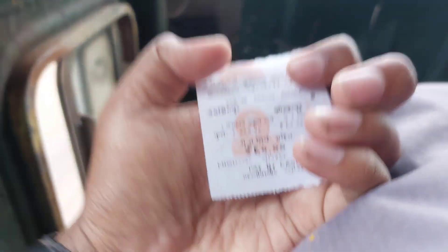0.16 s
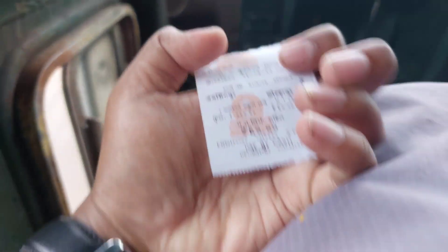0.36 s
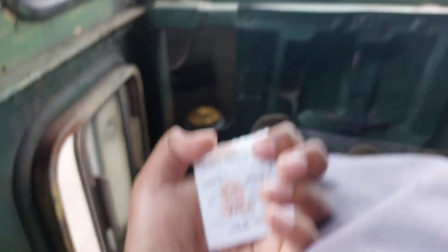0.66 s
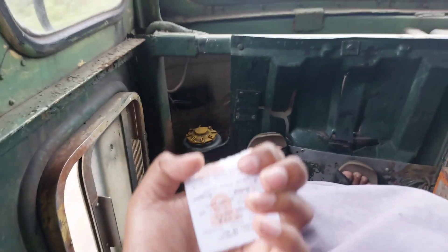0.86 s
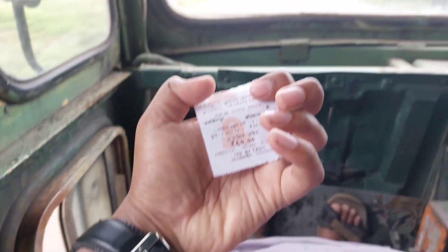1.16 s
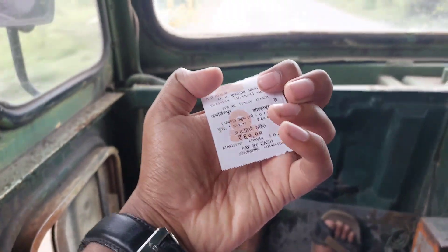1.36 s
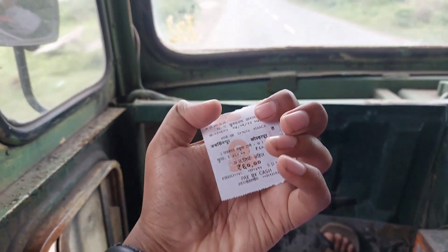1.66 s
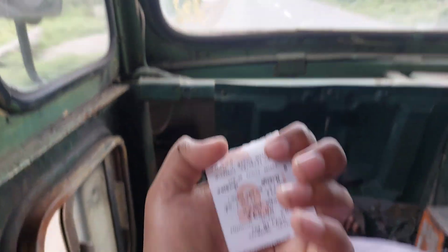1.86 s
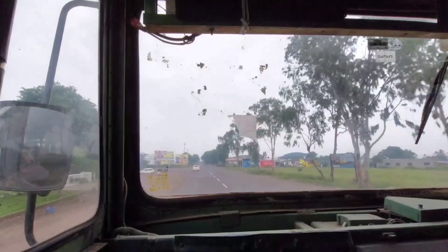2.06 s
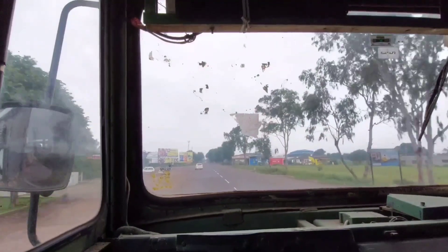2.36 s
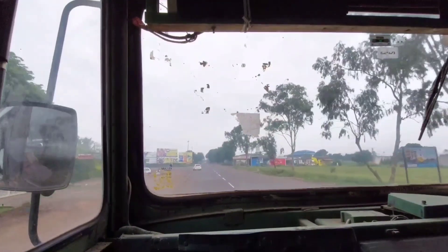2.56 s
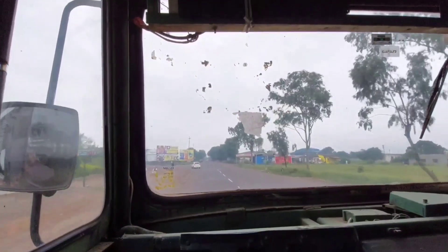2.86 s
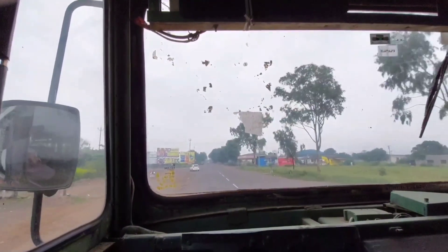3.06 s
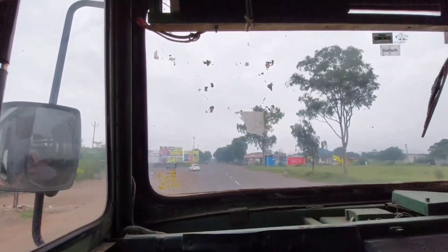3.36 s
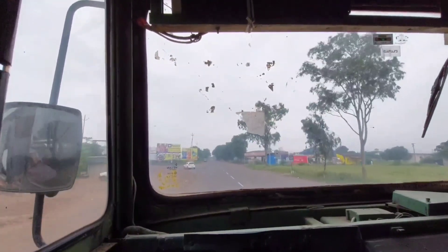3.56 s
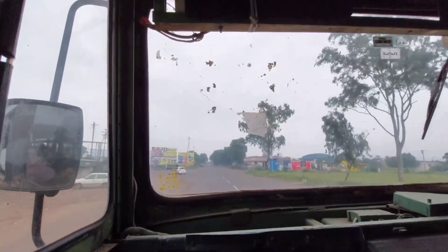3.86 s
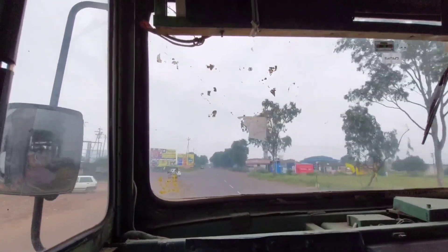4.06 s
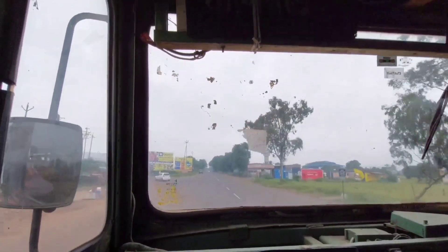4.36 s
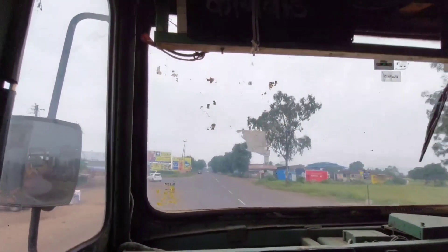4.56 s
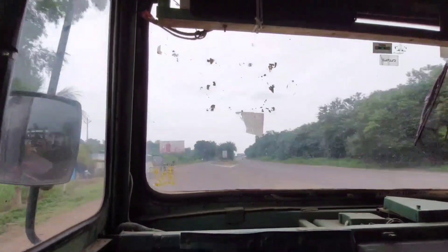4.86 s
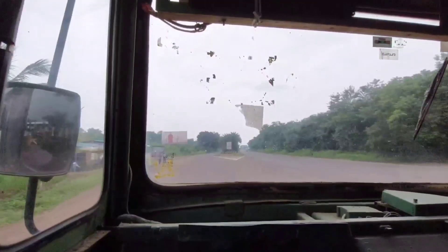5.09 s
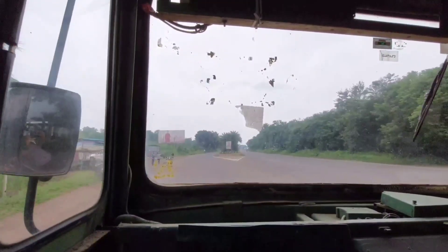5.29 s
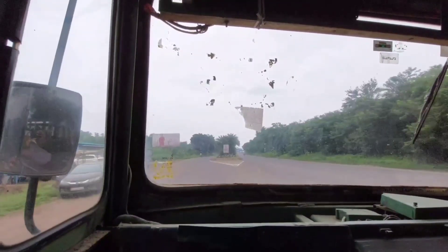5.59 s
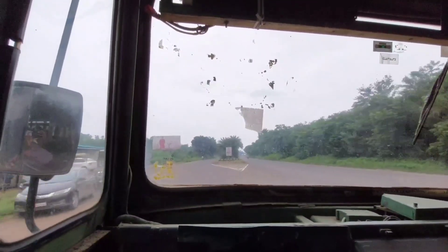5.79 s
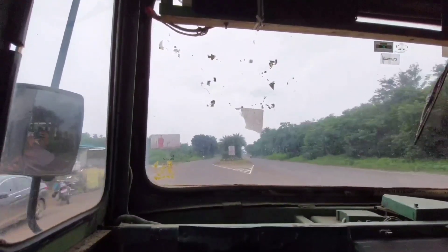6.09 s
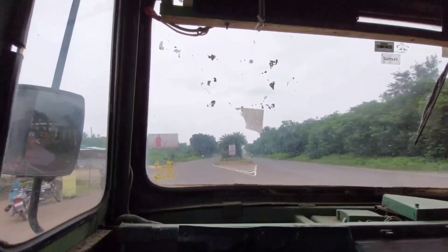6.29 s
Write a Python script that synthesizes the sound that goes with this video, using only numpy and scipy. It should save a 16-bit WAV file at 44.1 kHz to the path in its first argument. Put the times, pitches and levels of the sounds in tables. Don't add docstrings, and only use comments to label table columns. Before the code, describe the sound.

From 0 to 1.8 s, a loud old bus cabin: a rough diesel drone, steady then easing, buried in a broad roaring rush of tyres and air, with a faint high turbo whistle, dense gritty ticks, a whine from about 0.55 s and panel knocks near 0.4, 0.9, 1.05 and 1.3 s, a chirp at 1.3 s and a longer rattle at 1.72 s. It cuts dead to silence for about 0.14 s. At 1.95 s a stuttering click opens a far quieter ride: soft smooth hum, thin rush, slight rumble swells, engine sagging slowly, with a brief upward flare around 4.6 s. At 4.78 s another small click switches to a lower, slower hum with an early gust, faint glass ticks, weak squeaks and a low knock with chirps at 5.97 s, ending abruptly at 6.44 s. Wide stereo, dry and close.

```python
import sys
import numpy as np
from scipy import signal
from scipy.io import wavfile
from scipy.ndimage import uniform_filter1d

SR = 44100
rng = np.random.default_rng(int(sys.argv[2]) if len(sys.argv) > 2 else 0)


def gain_from_decibels(decibels):
    exponent = np.asarray(decibels, float) / 20
    return 10 ** exponent


def generate_wav(sig):
    pcm = np.round(np.clip(np.atleast_2d(sig).T, -1, 1) * 32767).astype(np.int16)
    wavfile.write(sys.argv[1], SR, pcm)


N = 283563

# [start t/s, end t/s, gain at the start, fade-in t/s]
MOMENTS = [
    (0, 1.8085, 1, 0),
    (1.9499, 4.7823, 1, 0),
    (4.7823, 6.44, .15, .02),
]
# [t/s, gain held until the next row]
STUTTER = [
    (0, 1),
    (1.9499, .6),
    (1.9512, .12),
    (1.9548, .7),
    (1.9585, .2),
    (1.9621, 1),
]
# [t/s, height, fading t/s (negative = grows up to the step)]
JOINS = [
    (1.9499, .009, .0008),
    (1.9512, -.007, -.0005),
    (1.9548, -.014, .001),
    (1.9573, .007, .001),
    (1.9621, -.032, .001),
    (4.7823, .026, -.001),
    (4.7872, .005, -.0005),
    (4.8022, .016, -.001),
]

# [t/s, twice the firing rate f/Hz, effort level/dB]
DRIVE = [
    [(0.0, 146.7, -0.5), (0.75, 147.3, 1), (1.05, 147.2, -1.5), (1.66, 146.7, -1.5), (1.81, 146.1, -5)],
    [(1.96, 139.5, 0), (2.35, 140.6, -1.5), (2.8, 139, 2), (3.25, 138.6, 2.5), (4.46, 133.8, 2),
     (4.65, 142.1, -2), (4.78, 137, -13.5)],
    [(4.8, 120.5, -5.5), (4.97, 121.9, 0), (5.13, 124.4, 0.5), (5.5, 123.9, -1.5), (5.8, 121.5, 1),
     (6.43, 118.8, -.5)],
]
# [multiple of the firing rate, rms level/dB, level gained over the moment/dB]
ORDERS = [
    [(1, -29, -1), (1.5, -40, 0), (2, -27, -1), (2.5, -31, 7), (3, -27, -5), (10 / 3, -32, 2),
     (3.5, -34, -6), (4, -35, 0), (4.5, -36, -7), (5, -35, -6), (5.5, -38, -6), (9, -44, 6), (12, -47, 3),
     (17, -50, 4)],
    [(1, -56, 2), (1.5, -57, 1), (2, -43, 2), (2.5, -53, 0), (3, -56, 2), (3.5, -57, 0), (4, -49, 2),
     (5, -62, 1), (6, -65, 2), (7, -66, -2), (8, -68, 1), (12, -69, 2)],
    [(1, -58, 1), (1.5, -61, 0), (2, -45.5, 1), (2.5, -58, 1), (3, -49.5, -1), (3.5, -56, 1), (4, -60, 0),
     (5.5, -64, -2), (8, -67, 0)],
]
UNEVEN_DB = [-40, -62, -63]

# [f/Hz, density level/dB per Hz]
ROAD_COLOURS = [
    [(45, 0.5), (100, -8), (240, -7), (420, -11), (700, -16.5), (1000, -16.5), (1600, -19.5), (2500, -26),
     (3500, -30.5), (5100, -27.5), (7500, -38.5), (10000, -47), (12200, -41), (15600, -53.5)],
    [(45, -5.5), (100, -15), (260, -9.5), (370, -22.5), (520, -21), (1000, -24.5), (1700, -26), (3300, -34),
     (5200, -36), (7200, -40.5), (9500, -53.5), (11000, -48.5), (12800, -45), (15600, -50.5)],
    [(45, -1), (80, -7), (200, -9), (340, -14), (400, -19.5), (520, -20), (1000, -24), (2200, -28.5),
     (3400, -35.5), (4800, -32), (7000, -41.5), (9700, -57), (12200, -53.5), (15600, -59)],
]
ROAD_DB = [-18, -40, -39.5]
# [f/Hz, width f/Hz, level/dB]
RINGING_PANELS = [
    [(260, 29, 4.5), (550, 21, 0.5), (833, 94, 2), (1060, 85, 2.5), (1245, 70, 3), (2120, 90, 0.5),
     (2620, 180, 1.5)],
    [(468, 66, 5.5), (770, 72, 4), (1090, 51, 6), (1260, 37, 5), (1550, 56, 3.5), (2500, 140, 3.5)],
    [(490, 68, 5), (740, 70, 3.5), (1110, 56, 8), (1447, 78, 7.5), (2520, 100, 1), (4370, 180, 1.5)],
]
LAYER_HZ = [90, 700, 5000, 11500]
# [t/s, gust level/dB]
GUSTS = [
    [(0.0, -4.5), (0.25, 3), (0.7, 5.5), (1.05, -0.5), (1.66, -2.5), (1.81, 6.5)],
    [(1.96, 0), (2.3, 0.9), (2.8, -0.1), (4.43, 0), (4.62, 3), (4.78, 5.5)],
    [(4.8, 2.5), (4.97, 4), (5.45, -0.5), (5.9, 0.5), (6.2, 2), (6.43, 1.5)],
]
GUST_SHARES = [
    (.05, 0.1, 0.23, 1),
    (.05, 0.53, 0.66, 0.8),
    (.05, .8, .5, .95),
]
# [t/s, level/dB, length t/s]
BUMPS = [(0.14, 0, 0.11), (0.595, -3, 0.14), (0.89, 2, 0.083), (1.5, 0, 0.13), (1.814, -1, 0.082),
         (2.14, 6.5, 0.53), (3.1, 5, 0.26), (3.72, 3, 0.067), (4.677, 7.5, 0.12), (5.35, 3, 0.48),
         (6.101, 5.5, 0.079)]

# [f/Hz, likeness 0-1, phase lead of the left/rad]
MIC_PAIR = [(60, 1, 0.046), (250, 0.77, 0.28), (600, 0.48, 0.28), (970, 0.24, 1.3), (1400, 0.17, 3.6),
            (1950, 0.4, 4.55), (3020, 0, 5.7), (6000, 0.07, 4.5)]
# [f/Hz, left minus right level/dB]
MIC_LEAN = [
    [(60, -2), (700, -1.5), (2400, 1), (4800, -6.5), (6500, -3), (8400, 6), (11500, 1), (15500, 13)],
    [(60, -1), (700, -1), (2800, 1), (6500, 0), (8700, 5), (12500, -3), (14000, -2), (15500, 1)],
    [(60, -1.5), (700, -1.5), (2400, 2), (4800, -7), (6500, -2), (8600, 7), (11500, 4), (15500, 10)],
]

# [t/s, f/Hz, rms level/dB]
TURBO = [
    [(0, 8650, -54), (.2, 8500, -54), (.8, 9570, -54), (.98, 9560, -56), (1.3, 8750, -57.5),
     (1.81, 7850, -55.5)],
    [(1.95, 7720, -71), (2.5, 7250, -72), (3, 6950, -71), (3.7, 6660, -72), (4.3, 6470, -73),
     (4.55, 6450, -77), (4.79, 6900, -84)],
    [(4.78, 7900, -79), (5.5, 6950, -77), (6.1, 6420, -76), (6.43, 6250, -76)],
]
TURBO_WIDTH_HZ = [130, 40, 50]

# [rate per s, level/dB]
TICKS = [
    (60, -54),
    (40, -77),
    (40, -78),
]
# [t/s, peak level/dB, t60 t/s]
GLASS = [(.1, -36, .027), (1.49, -47, .1), (2.375, -63, .1), (4.76, -57, .06), (5.632, -59, .03),
         (5.642, -67, .1), (5.718, -67, .03), (5.758, -67, .03), (5.945, -66, .04), (6.165, -63, .05),
         (6.205, -66, .1)]
# [t/s, peak level/dB, centre f/Hz, width f/Hz, t60 t/s]
RATTLES = [
    (.4, -30.5, 4450, 5000, .15),
    (0.8892, -27.5, 4930, 6000, 0.071),
    (1.052, -33, 6492, 9070, 0.094),
    (1.0779, -28.5, 5000, 9000, 0.072),
    (1.2966, -33, 7980, 8997, 0.059),
    (1.72, -33.5, 4970, 2480, 0.67),
    (4.56, -61, 2400, 3500, 1.5),
    (5.9722, -59, 5010, 8000, 0.11),
    (5.973, -47, 1500, 900, 0.1),
    (6.2734, -62, 5035, 3994, 0.049),
]
# [start t/s, length t/s, f/Hz, glide f/Hz, rms
# level/dB]
WHINES = [
    (.55, .6, 1772, -2, -46),
    (3.94, .15, 1540, 85, -64),
    (4.14, .26, 1545, 80, -65),
    (5.971, .05, 4360, -60, -61),
]
# [start t/s, length t/s, f/Hz, rms level/dB]
SQUEAKS = [
    (1.293, .021, 3340, -40),
    (3.1, .4, 1085, -67),
    (4.9, .6, 1108, -69),
    (5.22, .12, 1452, -66),
    (5.972, .024, 1445, -56),
    (5.975, .035, 5600, -67),
    (5.98, .04, 4600, -66),
    (6.15, .2, 1452, -68),
]

LOW_CUT_HZ = 57
STEADY_SHAKE_HZ, SHAKE_PER_GLIDE = 2, .075
SQUEAK_SAG, SQUEAK_SHAKE = .01, .017
GLASS_HZ, GLASS_WIDTH_HZ = 12050, 3900
RATTLE_LEAN = 0.46
CLOSE_S = .0004


def read(points, hz, column=1):
    table = np.array(points)
    return np.interp(np.log(hz + 1), np.log(table[:, 0] + 1), table[:, column])


def evened(x):
    return x / np.sqrt(np.mean(x ** 2) + 1e-20)


def wander(t, top_hz, count):
    coarse = np.arange(t[0], t[-1] + .01, .005)
    hz = np.geomspace(top_hz / 12, top_hz, 12)[:, None, None]
    sines = np.sin(2 * np.pi * (hz * coarse + rng.random((12, count, 1))))
    drift = (sines / np.sqrt(hz)).sum(0)
    return np.array([np.interp(t, coarse, evened(row)) for row in drift])


def resonate(x, hz, width):
    turn = np.exp(2j * np.pi * np.cumsum(hz * np.ones(x.shape[-1])) / SR)
    r = np.exp(-np.pi * width / SR)
    return 2 * (turn * signal.lfilter([1 - r], [1, -r], x / turn)).real


def resonant_noise(length, hz, width):
    once = resonate(rng.standard_normal((2, length)), hz, width)
    return evened(resonate(once, hz, width))


def add(mix, s, sound):
    part = mix[:, round(s * SR):][:, :sound.shape[1]]
    part += sound[:, :part.shape[1]]


def engine(t, rows, tones, uneven_db, sides, waver_db=1.0, uneven_waver_db=3.5, slip_rad=.13):
    s, twice_hz, effort_db = np.transpose(rows)[:3]
    firing = uniform_filter1d(np.interp(t, s, twice_hz), size=5000, mode="nearest") / 2
    turns = np.cumsum(firing) / SR
    effort_db = uniform_filter1d(np.interp(t, s, effort_db), size=4410, mode="nearest")

    sixths = np.array([k for k in range(4, 33) if k % 3]) / 6
    sixth_db = uneven_db + 2.6 * rng.standard_normal(len(sixths))
    sixth_db -= 3.5 * np.maximum(sixths - 3.6, 0)
    order, db, gained_db = np.concatenate([np.transpose(tones), [sixths, sixth_db, 0 * sixths]], axis=1)
    count = len(order)

    trend_db = gained_db[:, None] * np.linspace(-.5, .5, len(t))
    restless_db = np.where(np.arange(count) < len(tones), waver_db, uneven_waver_db)[:, None]
    level = gain_from_decibels(db[:, None] + trend_db + restless_db * wander(t, 6.0, count))
    phase = 2 * np.pi * (order[:, None] * turns + rng.random((count, 1)))
    phase += slip_rad * wander(t, 6.0, count)

    order_hz = order * firing.mean()
    lead = read(MIC_PAIR, order_hz, column=2)
    right_db = 0.4 * rng.standard_normal(count) - read(sides, order_hz) / 2
    mics = np.array([gain_from_decibels(-right_db) * np.exp(1j * lead), gain_from_decibels(right_db) + 0j])
    both = mics.real @ (level * np.cos(phase)) - mics.imag @ (level * np.sin(phase))
    return np.sqrt(2) * gain_from_decibels(effort_db - effort_db.mean()) * both


def road(t, gusts, shares, colour, panels, level_db, sides, patchy_db=0.87, flicker_db=1.15):
    frames, hz = len(t) // 256 + 5, np.fft.rfftfreq(1024, 1 / SR)
    a, b, c, d, patches = rng.standard_normal((frames, 513, 5)).T
    patches = uniform_filter1d(patches, size=10, axis=0)
    patches = evened(uniform_filter1d(patches, size=8, axis=1))
    flicker = evened(uniform_filter1d(rng.standard_normal(frames), size=3))
    flicker = flicker * np.clip(hz / 6000, 0, 1)[:, None]

    at = t[0] + (np.arange(frames) - 2) * 256 / SR
    swells = np.outer(shares, np.interp(at, *np.transpose(gusts)))
    swells[0] += sum(db * np.exp(-((at - s) / length) ** 2) for s, db, length in BUMPS)
    share = np.array([np.interp(np.log(hz + 1), np.log(LAYER_HZ), one) for one in np.eye(4)])
    swell_db = share.T @ (swells - swells.mean(1)[:, None])

    same = np.clip(read(MIC_PAIR, hz), 0, 1)[:, None]
    lead = np.exp(1j * read(MIC_PAIR, hz, column=2))[:, None]
    right = a + 1j * b
    left = same * lead * right + np.sqrt(1 - same ** 2) * (c + 1j * d)
    lean_db = read(sides, hz)[:, None] / 2
    z = np.array([left * gain_from_decibels(lean_db), right * gain_from_decibels(-lean_db)])

    ring_db = sum(db / (1 + (2 * (hz - peak_hz) / width) ** 2) for peak_hz, width, db in panels)
    colour_db = (read(colour, hz) + ring_db)[:, None]
    z *= gain_from_decibels(colour_db + swell_db + patchy_db * patches + flicker_db * flicker)
    return gain_from_decibels(level_db) * evened(signal.istft(z, nperseg=1024, noverlap=768)[1][:, :len(t)])


def turbo(t, rows, width_hz, waver_db=1.0):
    s, hz, db = np.transpose(rows)
    hz = uniform_filter1d(np.interp(t, s, hz), size=4410, mode="nearest")
    breath = resonant_noise(len(t), hz, width_hz)
    shaky_hz = hz + .5 * width_hz * wander(t, 60.0, count=1)[0]
    tone = np.cos(2 * np.pi * np.cumsum(shaky_hz) / SR + np.array([[0], [1.0]]))
    return evened(tone + .8 * breath) * gain_from_decibels(np.interp(t, s, db) + waver_db * wander(t, 30.0, count=1))


def ticks(t, per_s, db, spread_db=3.5, tick_hz=12500., width_hz=4000.):
    size = gain_from_decibels(spread_db * np.minimum(rng.exponential(1, (2, len(t))), 4))
    size = size * (rng.random(len(t)) < per_s / SR)
    tail = rng.standard_normal(600) * gain_from_decibels(-60 * np.arange(600) / SR / 0.0085)
    clicks = signal.oaconvolve(size, tail[None], axes=1)[:, :len(t)]
    return gain_from_decibels(db) * resonate(clicks, tick_hz, width_hz)


def rattle(db, hz, width_hz, t60):
    t = np.arange(11000) / SR
    pan_db = RATTLE_LEAN * read(MIC_LEAN[0], hz)
    decay = gain_from_decibels(db - 60 * t / t60) * np.minimum(t / 0.0014, 1)
    return resonant_noise(len(t), hz, width_hz) * decay * gain_from_decibels([[pan_db / 2], [-pan_db / 2]])


def whine(start, length, start_hz, glide_hz, shake_hz, db):
    t = start + np.arange(0, length, 1 / SR)
    shake, flutter = wander(t, 60.0, count=2)
    hz = start_hz + np.linspace(0, glide_hz, len(t)) + shake_hz * shake
    tone = np.sqrt(2) * np.cos(2 * np.pi * np.cumsum(hz) / SR) * gain_from_decibels(db + 2.0 * flutter)
    return tone * signal.windows.tukey(len(t), .3) * gain_from_decibels([[-1], [1]])


def loose_parts():
    cabin = np.zeros((2, N + SR))
    for s, db, t60 in GLASS:
        add(cabin, s, rattle(db, GLASS_HZ, GLASS_WIDTH_HZ, t60))
    for s, *row in RATTLES:
        add(cabin, s, rattle(*row))
    for s, length, hz, glide_hz, db in WHINES:
        shake_hz = STEADY_SHAKE_HZ + SHAKE_PER_GLIDE * abs(glide_hz)
        add(cabin, s, whine(s, length, hz, glide_hz, shake_hz, db))
    for s, length, hz, db in SQUEAKS:
        add(cabin, s, whine(s, length, hz, -SQUEAK_SAG * hz, SQUEAK_SHAKE * hz, db))
    return cabin


def join(height, fading):
    step = height * np.exp(-np.arange(200) / SR / abs(fading))
    return np.array([[.85], [1.15]]) * (step if fading > 0 else step[::-1])


def scene():
    mix, cabin = np.zeros((2, N)), loose_parts()
    low_cut = signal.butter(3, LOW_CUT_HZ, "high", fs=SR, output="sos")
    steps, held = np.transpose(STUTTER)
    for k, (start, end, first, fade) in enumerate(MOMENTS):
        at = np.arange(round(start * SR), round(end * SR))
        t = at / SR
        ride = engine(t, DRIVE[k], ORDERS[k], UNEVEN_DB[k], MIC_LEAN[k])
        ride += road(t, GUSTS[k], GUST_SHARES[k], ROAD_COLOURS[k], RINGING_PANELS[k], ROAD_DB[k], MIC_LEAN[k])
        ride += turbo(t, TURBO[k], TURBO_WIDTH_HZ[k])
        ride += ticks(t, *TICKS[k])
        ride += cabin[:, at]
        gain = np.interp(t, [start, start + fade, end - CLOSE_S, end], [first, 1, 1, 0])
        gain *= held[np.searchsorted(steps, t, "right") - 1]
        add(mix, t[0], signal.sosfilt(low_cut, ride) * gain)
    for s, height, fading in JOINS:
        add(mix, s - (fading < 0) * 200 / SR, join(height, fading))
    return mix


def band_limit(x):
    return signal.sosfilt(signal.butter(12, 15700, fs=SR, output="sos"), x)


def record(dry):
    return band_limit(dry)


dry = scene()
out = record(dry)
generate_wav(out)
```